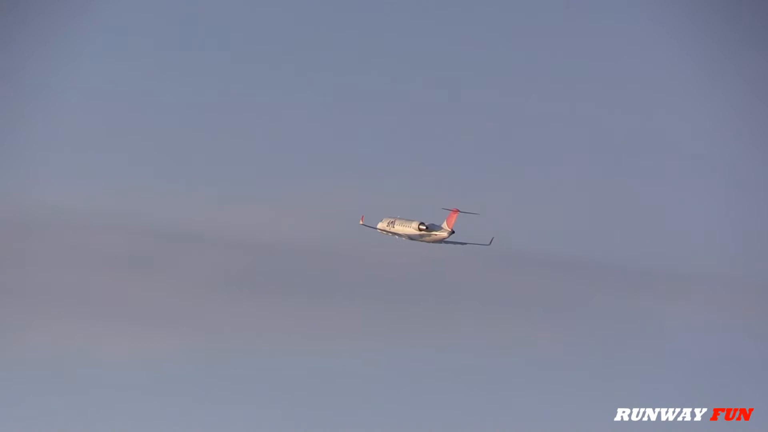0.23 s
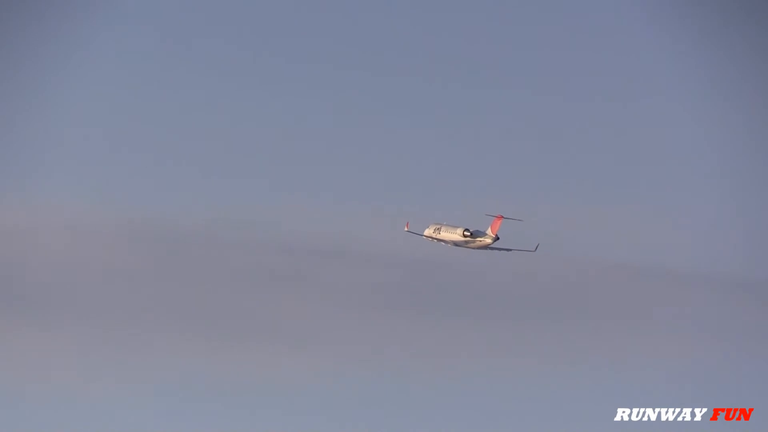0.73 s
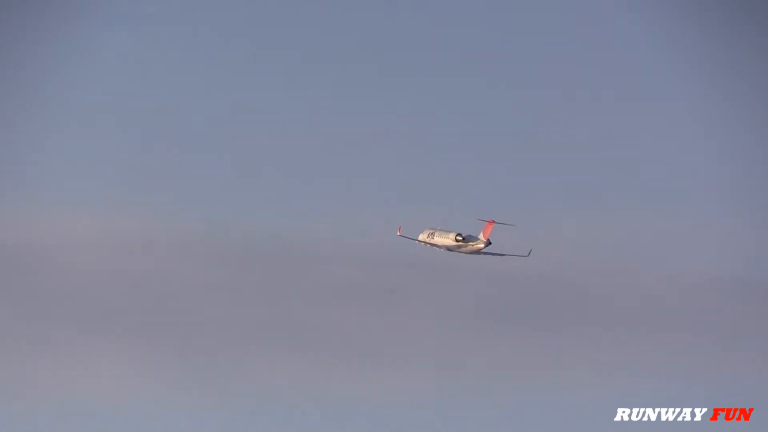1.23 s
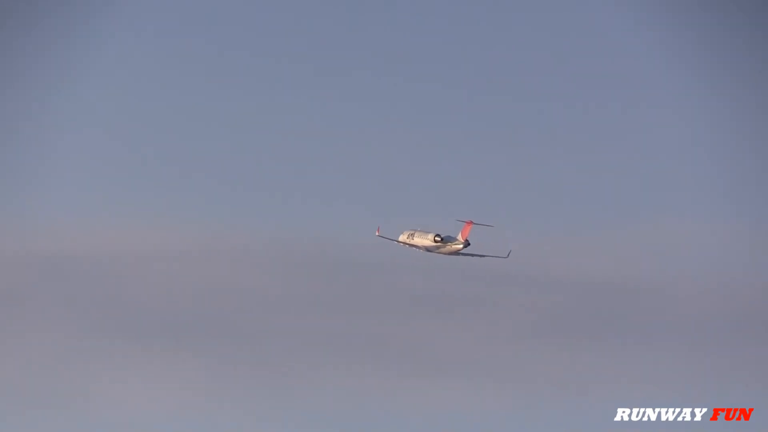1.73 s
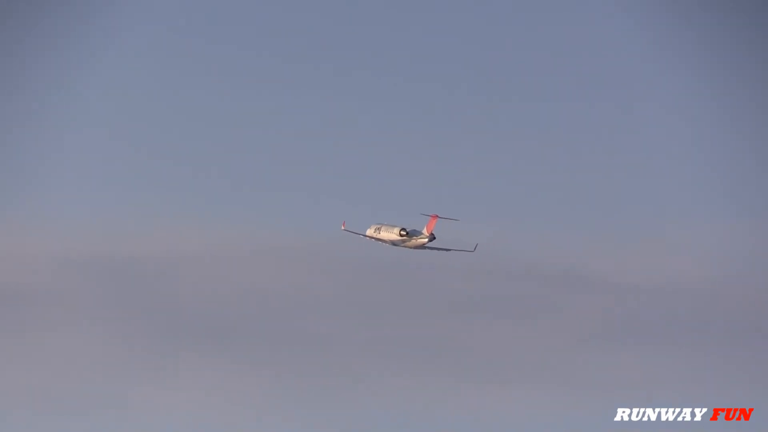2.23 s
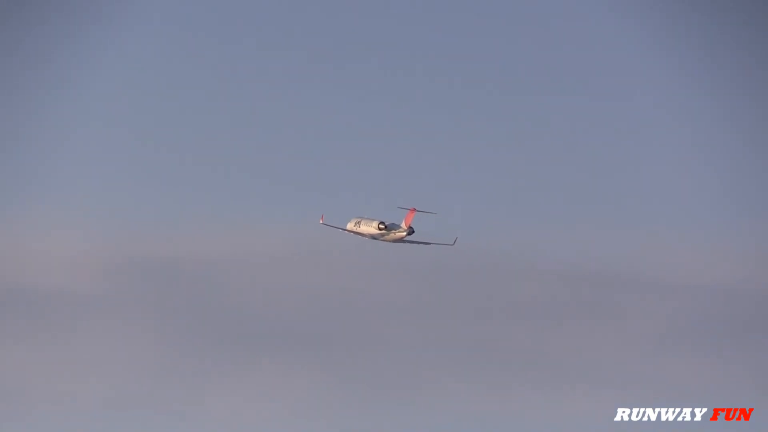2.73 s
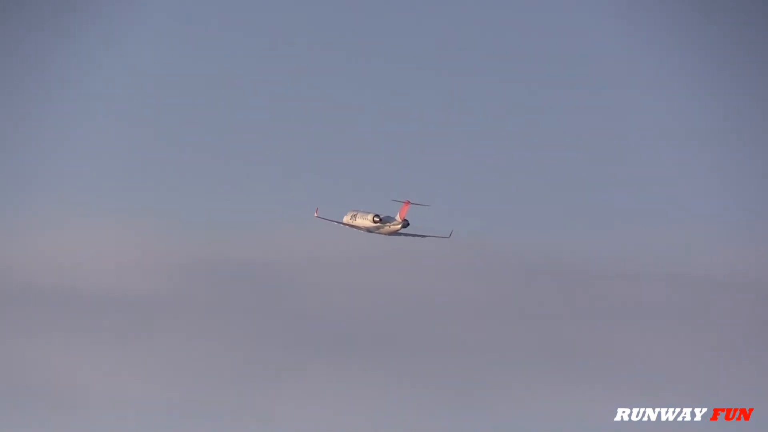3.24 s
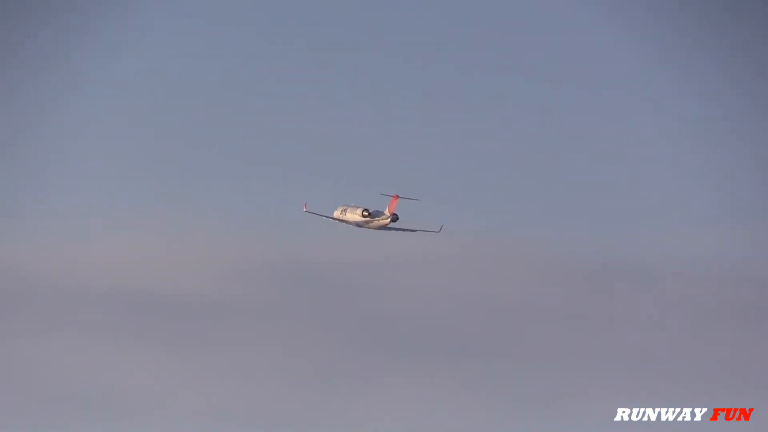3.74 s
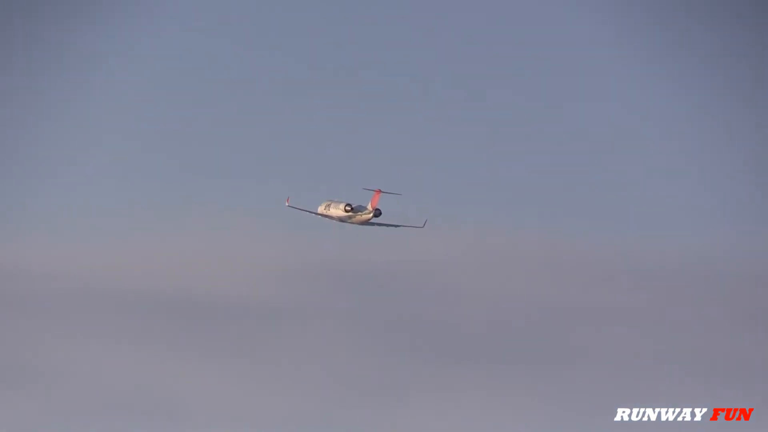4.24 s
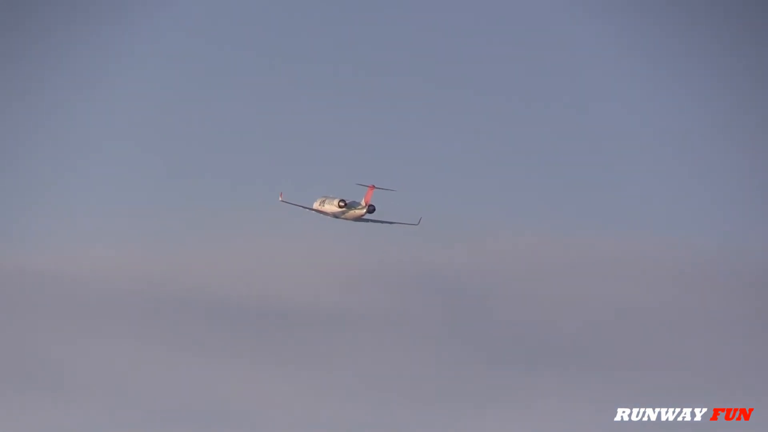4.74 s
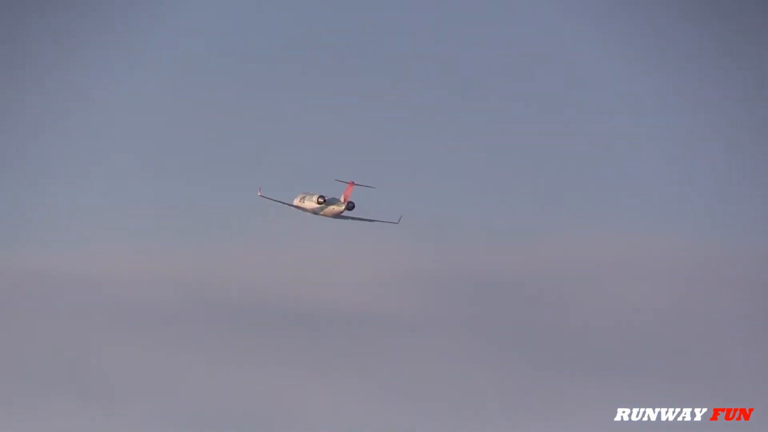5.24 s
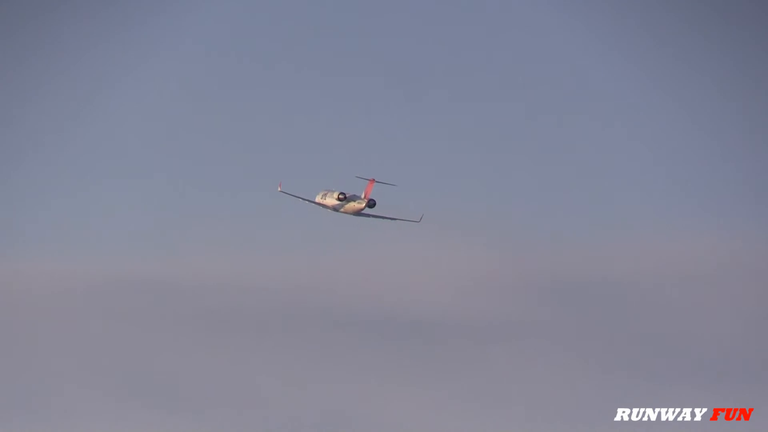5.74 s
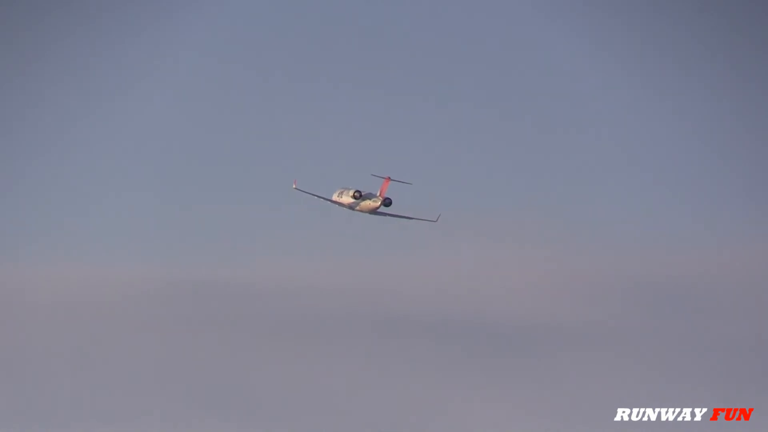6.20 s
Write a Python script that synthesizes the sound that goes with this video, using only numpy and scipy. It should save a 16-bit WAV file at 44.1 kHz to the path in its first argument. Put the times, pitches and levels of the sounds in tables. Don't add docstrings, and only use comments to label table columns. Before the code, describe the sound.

Steady low jet rumble is present from the start and never stops, wavering as the air shifts and growing darker as the small plane recedes. Brief, dry shutter clatters come from a camera close by, a little left of centre, clustered around the first second and then sparse. A quiet preamplifier hiss lies over everything. Open air, stereo microphone on the ground, distant aircraft.

```python
import sys
import numpy as np
from scipy import signal
from scipy.fft import rfft, irfft, next_fast_len
from scipy.io import wavfile
from scipy.ndimage import uniform_filter1d

SR = 44100
rng = np.random.default_rng(int(sys.argv[2]) if len(sys.argv) > 2 else 0)


def rack_gain(trim_db):
    fader = np.asarray(trim_db, float)
    return 10 ** (fader / 20)


def generate_wav(signal):
    frames = np.transpose(np.atleast_2d(signal))
    scaled = np.clip(frames, -1, 1) * 32767
    pcm = np.round(scaled).astype(np.int16)
    wavfile.write(sys.argv[1], SR, pcm)


N = 285327
BLADES = 28

# (time [s], gain [dB], clarity above the rumble [dB/octave])
AIR_FOCUS = [(0, 2.5, -0.48), (.4, -1.1, 0.92), (.75, 0.1, .5), (1.35, 1.94, -0.55), (1.7, -1.3, 0.42),
             (2.1, 0.25, -0.2), (2.45, -1, 0), (2.85, 0.15, -0.15), (3.2, -0.7, -0.25), (3.5, 0, -0.2),
             (3.9, -1.9, 1.03), (4.2, -0.7, 0.3), (4.63, -0.5, 0.14), (5.1, -2.1, 0.95), (5.35, -0.4, 0.4),
             (5.7, -2.45, 1.14), (6.15, 0.9, 0), (6.47, 0.8, 0.5)]
# (frequency [Hz], density [dB per Hz])
EXHAUST_COLOUR = [(18, -48.5), (38, -16.5), (53, -20.5), (68, -5.5), (92, -5.5), (110, 1.5), (155, -0.5),
                  (300, -8.5), (500, -15.5), (790, -21.5), (1150, -31.5), (1750, -45.5), (2300, -57),
                  (4500, -94)]
# (frequency [Hz], side minus mid [dB])
SCATTERED_SHARE = [(30, -18.5), (70, -36.5), (140, -30.5), (250, -14.5), (360, -17), (520, -4), (1000, -3),
                   (2000, -6), (3500, 5)]
# (multiple of the shaft rate [1], level [dB])
SHAFT_ORDERS = [(4, -53), (5, -51), (6, -53), (7, -49.5), (8, -56), (9, -58), (10, -70), (11, -64),
                (12, -64), (BLADES, -86)]
# (multiple of the shaft rate [1], start [s], length [s], gain [dB])
TONE_CLEARINGS = [(BLADES, .57, .31, 16), (BLADES, 1.27, .38, 12), (BLADES, 1.65, .25, 9),
                  (BLADES, 2.08, .15, 8), (8, 3.75, 2.3, 12.5), (12, 4.3, 1.2, 7), (5, 0, .7, 6),
                  (7, 0, .8, 3), (6, 1.45, .9, 8), (8, 1.2, .8, 6), (7, 2.5, .7, 3), (6, 3.2, .5, 5),
                  (6, 4.4, .8, 7), (7, 3.4, .9, 3), (7, 4.9, 1.3, 4)]
# (frequency [Hz], density [dB per Hz])
HISS_COLOUR = [(1470, -25.5), (2500, -0.5), (7440, -5), (8290, -5), (9460, -5.5), (14100, -6.5),
               (15200, -4.5), (15900, -7)]
# (frequency [Hz], level [dB])
ELECTRONIC_WHISTLES = [(8392, -99), (10202, -99.5), (10777, -100.5), (12587, -99)]
# (time [s], peak [dB], left minus right [dB],
# share of treble reaching the ports [0-1])
SHUTTER_RELEASES = [
    (0.19, -41, 3.5, 0.9),
    (.888, -43, 3, 0.67),
    (1.018, -61, -4, .3),
    (1.066, -52.5, 2, 0.1),
    (1.2411, -43.5, 4, 0.63),
    (2.303, -41.5, 3.5, 0.93),
    (3.7813, -40.5, 4, 1),
    (4.7693, -60.5, .5, 0.42),
    (5.124, -43, 4, 1),
]
# (time after start [ms], level [dB], brightness [1])
MECHANISM_BLOWS = [(0, -16, 1.2), (0.508, -6.5, 1.4), (1.123, -0.5, 1), (2.1, 0.5, 1), (4.09, 2, 0.6),
                   (5.298, -1, 0.8), (7.494, 1, 0.9), (9.52, -4.5, 0.9), (11.7, -22, 0.4), (12.46, -9, 0.6),
                   (16.2, -9.5, 0.3), (18.79, -1.5, 0), (20.24, -5.5, 0), (27.5, -15, 0.2), (34, -11, .4)]
# (frequency [Hz], level [dB], 60 dB decay time [s])
BODY_MODES = [(1290, 3, 0.023), (1650, -10.5, 0.02), (1800, -3.5, 0.026), (2157, 1.5, 0.027),
              (2550, -5, .01), (2960, -8, .01), (3450, -9.5, 0.0089), (3790, -10.5, 0.0081),
              (4470, -3, 0.006), (4700, -2.5, 0.0053), (5160, -5.5, 0.007), (6220, -8.5, 0.0043),
              (6830, -5, 0.0055), (7560, -12.5, .006), (8500, -13, .006), (9600, -10, .005),
              (10350, -12.5, .005), (11500, -14, .004), (12500, -17, .004), (14000, -24, .003),
              (15300, -22, .003)]

LONG = next_fast_len(N + SR)
T = np.arange(N) / SR
RUMBLE_HZ = 90.0


def shaped(colour):
    hz, db = np.transpose(colour)
    log_hz = np.log(np.fft.rfftfreq(LONG, 1 / SR) + 1)
    envelope = rack_gain(np.interp(log_hz, np.log(hz), db))
    return rfft(rng.standard_normal(LONG)) * envelope


def level(x, db):
    return x * rack_gain(db) / np.sqrt(np.mean(x ** 2))


def walk(rate):
    hold = int(SR / rate)
    steps = np.repeat(rng.standard_normal(N // hold + 1), hold)
    slewed = uniform_filter1d(uniform_filter1d(steps, hold), hold)
    return 1.21 * slewed[:N]


def air_path():
    start_m, recedes_m_s = 560, 78
    absorption_db_per_km = 5
    s, gain_db, clarity_db = np.transpose(AIR_FOCUS)
    gain_db, clarity_db = np.interp(T, s, gain_db), np.interp(T, s, clarity_db)
    metres = recedes_m_s * T
    spread_db = gain_db - 20 * np.log10(1 + metres / start_m)

    def path_db(hz):
        absorbed_db = absorption_db_per_km * (hz / 1000) * metres / 1000
        octaves_above = max(np.log2(hz / RUMBLE_HZ) - 1, 0)
        return spread_db - absorbed_db + clarity_db * octaves_above

    return path_db


def roar(path_db):
    flicker_db, flicker_rate_hz = 0.63, 9.0
    drift_db, drift_rate_hz = 0.3, 2.5
    rumble_gain_db_s = 1.05
    mid, side = shaped(EXHAUST_COLOUR), shaped(EXHAUST_COLOUR)
    octave = np.log2(np.fft.rfftfreq(LONG, 1 / SR) + 1)
    scatter_hz, scatter_db = np.transpose(SCATTERED_SHARE)
    out = 0
    for centre in np.arange(4, 13, 0.5):
        hz = 2 ** centre
        share = np.clip(1 - 2 * abs(octave - centre), 0, 1)
        db = path_db(hz) + rumble_gain_db_s * T / (1 + (hz / RUMBLE_HZ) ** 2)
        db = db - 10 * np.log10(np.mean(rack_gain(2 * db)))
        db = db + flicker_db * walk(flicker_rate_hz) + drift_db * walk(drift_rate_hz)
        wide = rack_gain(np.interp(centre, np.log2(scatter_hz), scatter_db))
        direct = irfft(mid * share, LONG)[:N]
        scattered = wide * irfft(side * share, LONG)[:N]
        out = out + rack_gain(db) * (direct + scattered * np.array([[1], [-1]]))
    return level(out, -28)


def fan(path_db):
    shaft_hz, sag_hz, settles_s = 86.75, 2.2, 4.0
    waver, fade_db, clearing_edge_s = 0.00029, 1.4, 0.07
    lag_ms = 0.047
    hz = shaft_hz - sag_hz * (1 - np.exp(-T / settles_s))
    turns = np.cumsum(hz * (1 + waver * walk(6.0))) / SR
    late = hz * lag_ms / 1000 * np.array([[0], [1]])
    out = 0
    for order, db in SHAFT_ORDERS:
        db = db + path_db(order * shaft_hz) + fade_db * walk(5.0)
        for multiple, s, length, gain_db in TONE_CLEARINGS:
            if round(multiple) == round(order):
                inside_s = np.minimum(T - s, s + length - T)
                db = db + gain_db * np.clip(inside_s / clearing_edge_s + 0.5, 0, 1)
        phase = 2 * np.pi * (round(order) * (turns - late) + rng.random())
        out = out + np.sqrt(2) * rack_gain(db) * np.sin(phase)
    return out


def hiss():
    common = 0.1
    both = shaped(HISS_COLOUR)
    noise = np.array([irfft(shaped(HISS_COLOUR) + common * both, LONG)[:N] for _ in range(2)])
    out = level(noise, -69)
    for hz, db in ELECTRONIC_WHISTLES:
        out = out + np.sqrt(2) * rack_gain(db) * np.sin(2 * np.pi * hz * T)
    return out


def release(t, rattle):
    rattle_ms, rattle_db = 1.6, -11
    hz, db, t60 = np.transpose(BODY_MODES)[:, :, None]
    rattle = signal.lfilter(*signal.butter(1, [3000, 9000], "band", fs=SR), rattle)
    sound = 0
    for ms, blow_db, bright in MECHANISM_BLOWS:
        after = np.clip(t - ms / 1000, 0, None)
        wake = np.clip(bright, 0.01, 2) ** np.log2(hz / 2000).clip(0, 1.5)
        decay = np.exp(-np.log(1000) * after / t60)
        ring = np.sum(wake * rack_gain(db) * decay * np.sin(2 * np.pi * hz * after), axis=0)
        shake_decay = (after > 0) * np.exp(-after * 1000 / rattle_ms)
        shake = rack_gain(rattle_db) * bright * rattle * shake_decay
        sound = sound + rack_gain(blow_db) * (ring + shake)
    return sound


def shutter():
    loose, gain_db = 0.6, -7.0
    echo_db, echo_ms, gap_ms = -27, 5.0, 1.6
    t = np.arange(int(0.07 * SR)) / SR
    same = rng.standard_normal(len(t))
    echo_decay = (t > gap_ms / 1000) * np.exp(-t * 1000 / echo_ms)
    echoes = rack_gain(echo_db) * rng.standard_normal((2, len(t))) * echo_decay
    echoes[:, 0] = 1
    shade = signal.butter(2, 6000, fs=SR)
    out = np.zeros((2, N + 2 * len(t)))
    for s, peak_db, pan_db, treble in SHUTTER_RELEASES:
        snap = release(t, same + loose * rng.standard_normal(len(t)))
        snap = treble * snap + (1 - treble) * signal.lfilter(*shade, snap)
        sound = signal.fftconvolve(snap[None], echoes, axes=1)
        port_db = peak_db + gain_db + np.array([[pan_db], [-pan_db]]) / 2
        i = int(s * SR)
        out[:, i:i + sound.shape[1]] += rack_gain(port_db) * sound
    return out[:, :N]


def scene():
    path_db = air_path()
    return roar(path_db) + fan(path_db) + hiss() + shutter()


def top_cut(x):
    return signal.sosfilt(signal.butter(12, 16030, fs=SR, output="sos"), x)


def record(dry):
    top = signal.ellip(10, 0.1, 40, 15760, fs=SR, output="sos")
    balanced = dry * rack_gain(np.array([[-0.6], [0.6]]))
    mix = signal.sosfiltfilt(top, balanced)
    return top_cut(mix)


dry = scene()
out = record(dry)
generate_wav(out)
```